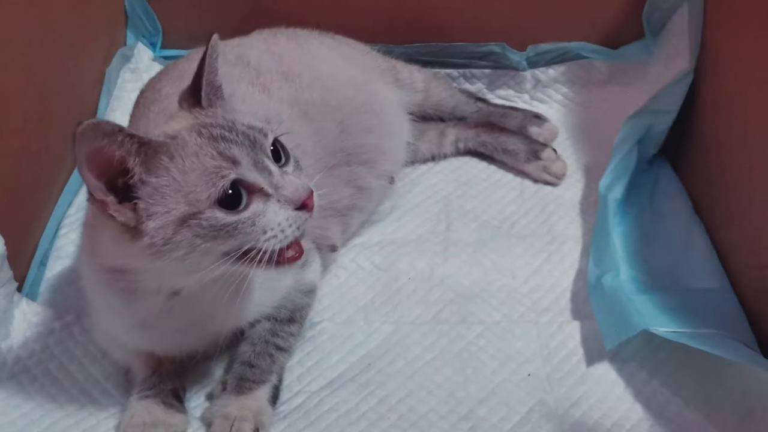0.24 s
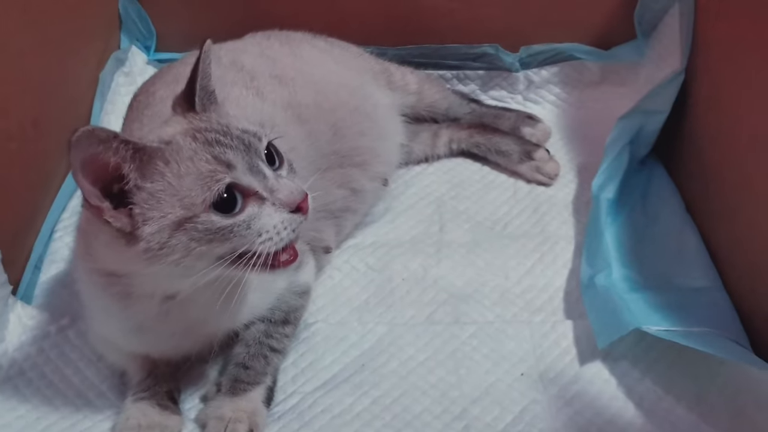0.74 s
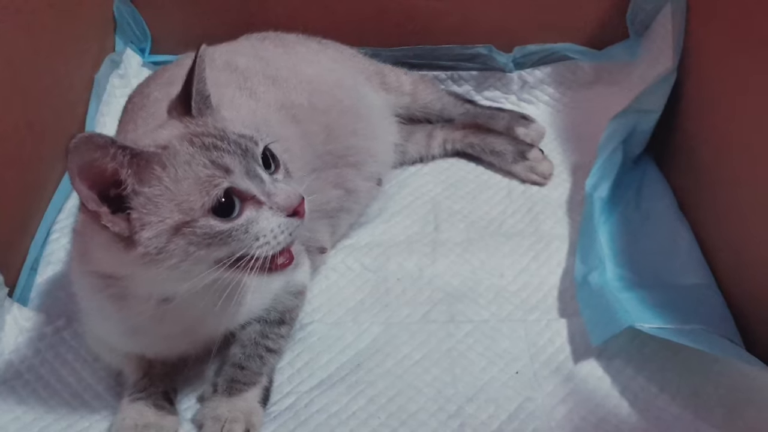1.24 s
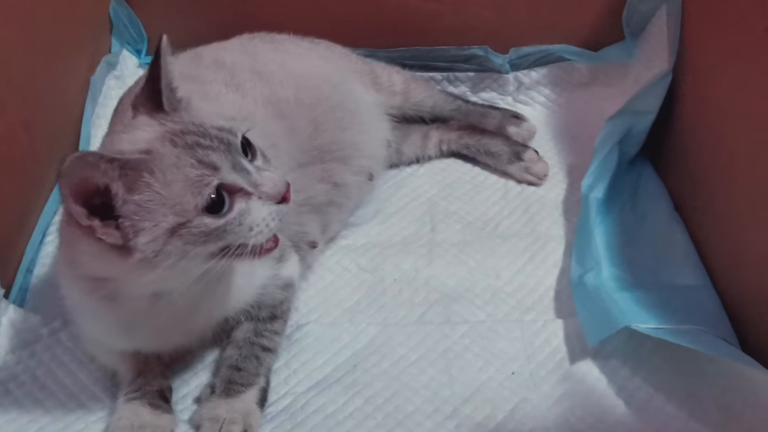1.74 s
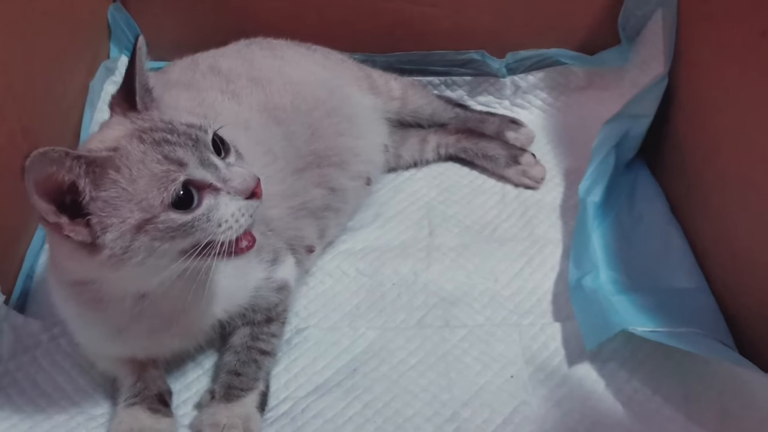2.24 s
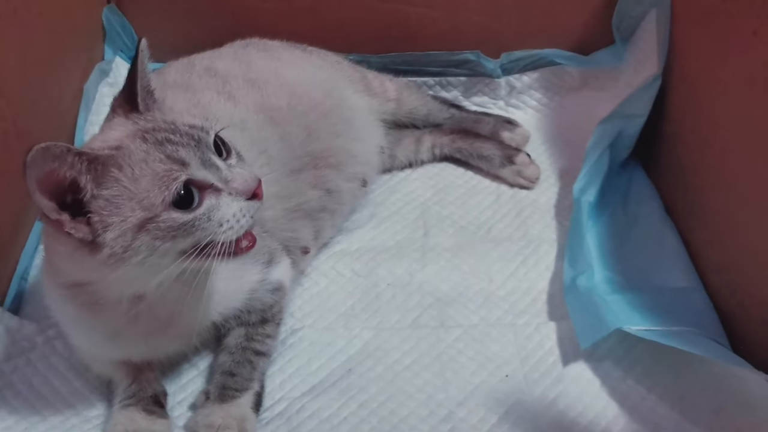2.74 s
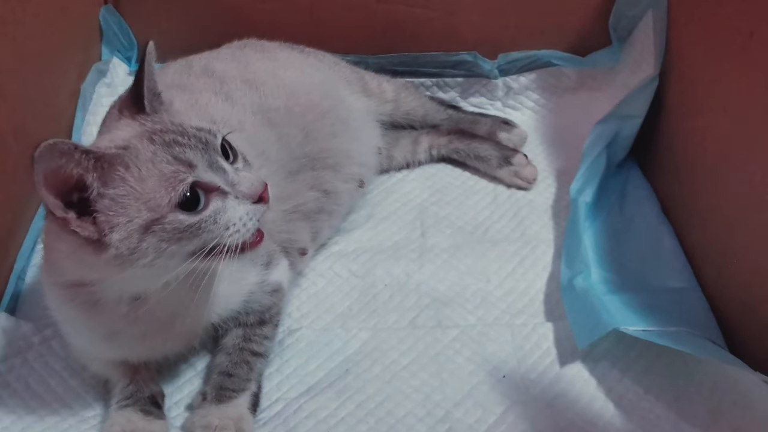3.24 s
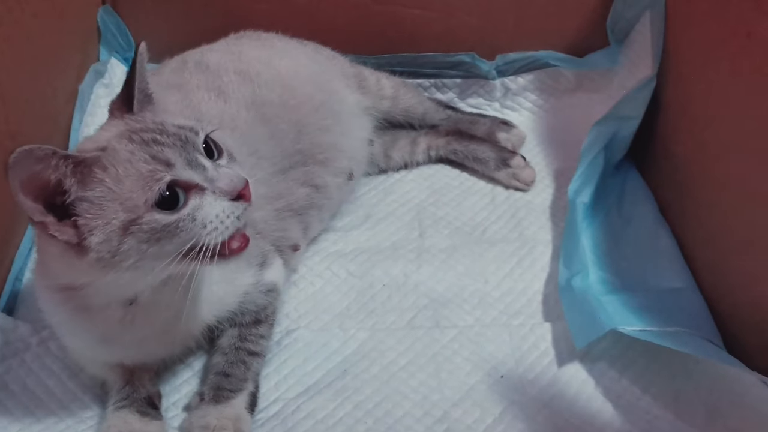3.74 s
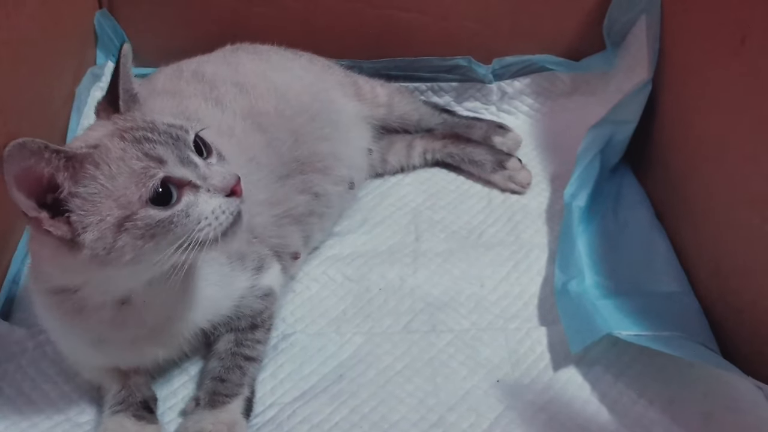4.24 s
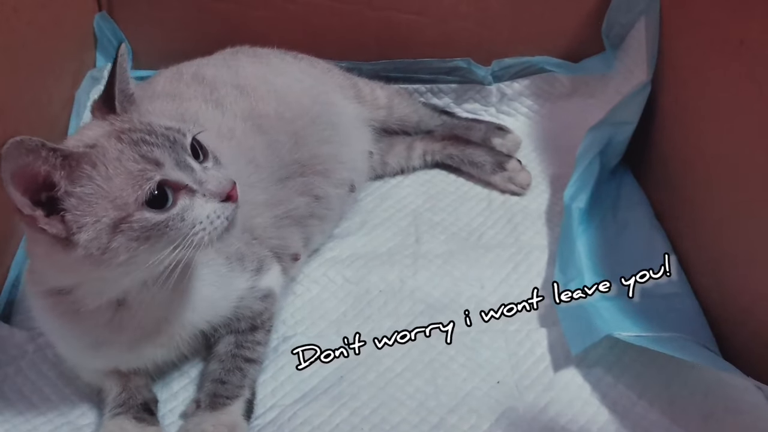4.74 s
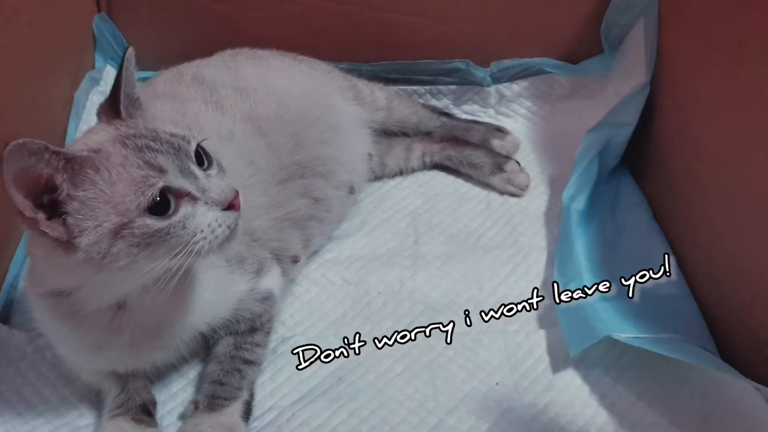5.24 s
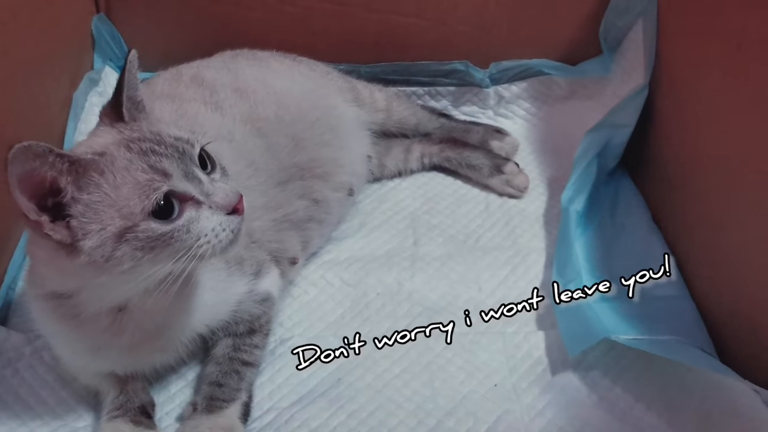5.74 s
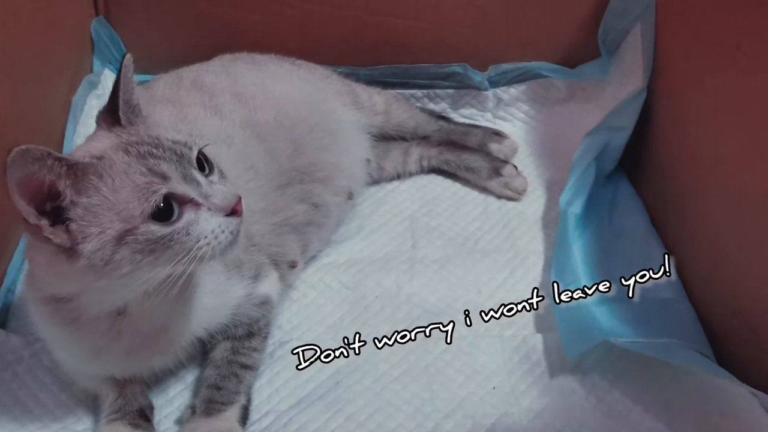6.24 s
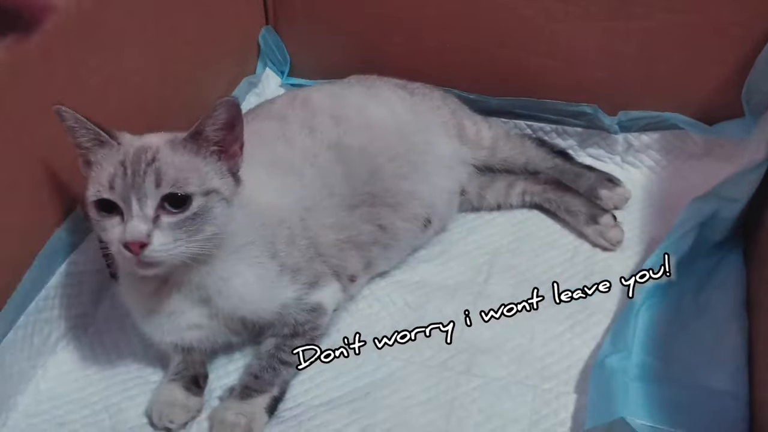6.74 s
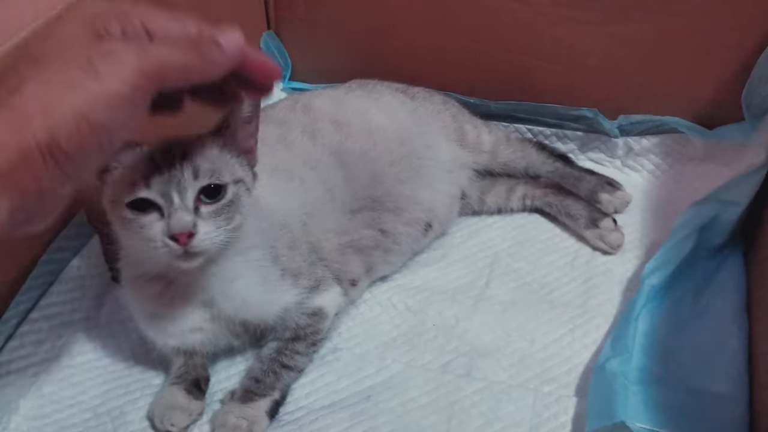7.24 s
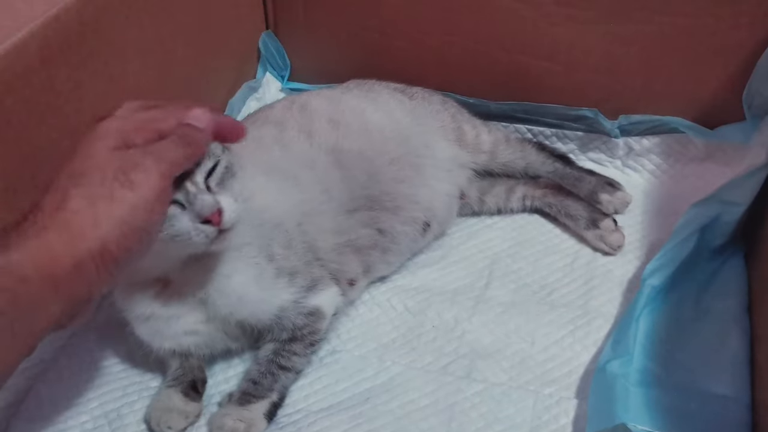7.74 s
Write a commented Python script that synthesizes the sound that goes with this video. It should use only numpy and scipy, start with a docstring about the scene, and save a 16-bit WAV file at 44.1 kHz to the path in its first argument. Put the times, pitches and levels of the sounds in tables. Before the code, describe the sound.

From the start a compressor motor drones in a room, a low hum that throbs five or six times a second over the even rush of its fan and a faint, fine rattle. At about 3.5 seconds a cat in a padded box mews once, just right of centre. The call opens with a thin, high squeak, holds a nearly level pitch, rises above the drone and fades by 3.9 seconds, with very little echo. The machine carries on, swelling slightly for an instant at about 5 seconds and again near 6.4. At about 6.7 seconds the sound changes abruptly to another microphone position, where the drone and rush are weaker. From there a hand shifting on the microphone adds a soft, lumpy bass rumble, with several small bumps over the continuing hum until the end at 8 seconds.

```python
"""A compressor motor drones in the room over the rush of its fan; its shaft turns a little slower
than the mains field, so the drone throbs. Midway a cat mews once from inside a padded box, the
harmonics of its vocal folds shaped by throat and mouth. The two-port microphone takes the room from
two positions, joined by a cut: at the second the drone is weaker and the hand on the case rumbles."""
import sys
import numpy as np
from scipy import signal
from scipy.io import wavfile
from scipy.ndimage import uniform_filter1d

SR = 44100
rng = np.random.default_rng(int(sys.argv[2]) if len(sys.argv) > 2 else 0)


def int16_out(signal):
    """Quantize to a 16-bit WAV file."""
    q = np.round(np.clip(np.atleast_2d(signal).T, -1, 1) * 32767)
    wavfile.write(sys.argv[1], SR, q.astype(np.int16))


N = 352342

# the cat's voice: t/s, pitch f/Hz, effort level/dB, mouth opening/0-1
MEW_CURVE = [(3.525, 598, -48, .6), (3.55, 593, -37.5, 0.87), (3.6, 593, -33, 0.98), (3.635, 602, -28, 1),
             (3.654, 613, -33.5, .95), (3.668, 592.6, -28, .9), (3.705, 581.7, -30, .75),
             (3.76, 591, -34, .25), (3.815, 606, -37, 0), (3.83, 605, -47, 0.92), (3.87, 600, -54, 0.68)]
# throat resonances: f/Hz, width/Hz, level/dB, exponent with which each follows the mouth
FORMANTS = [(600, 350, -15, -3), (1170, 420, -0.5, -2.5), (2286, 440, 2, 0.9), (3060, 330, -10, 0.1),
            (3850, 500, -21, 4), (5500, 570, -39, 0.8), (6580, 420, -24, 1.2), (7830, 720, -26.5, 1),
            (9200, 770, -42, .6)]
# the squeak that opens the mew: t/s, f/Hz, level/dB
SQUEAK_CURVE = [(3.49, 1950, -56), (3.515, 2135, -50), (3.525, 2320, -37), (3.535, 2145, -38),
                (3.545, 2370, -46)]
# breath at both ends of the mew: t/s, half-width/s, level/dB
BREATH_PUFFS = [(3.53, .012, -69), (3.835, .016, -64)]
# echoes off the box walls: delay/ms, factor at the left port, factor at the right port
BOX_ECHOES = [(.6, .45, -.45), (1.05, -.4, .4), (2.3, .15, .12)]
# motor speed, one table a microphone position: t/s, shaft f/Hz, throb f/Hz
MOTOR_SPEED = [
    [(0, 57.197, 5.573), (2.5, 57.168, 5.567), (5, 57.14, 5.578), (6.74, 57.119, 5.595)],
    [(6.74, 57.157, 5.65), (8, 57.157, 5.65)],
]
# drone: shaft order, throb sideband, then for each position level/dB, left-right/dB, left lead/rad
DRONE_LINES = [(2, 0, -41.2, -2.4, 0.1, -46.1, -3.9, -0.0), (2, 1, -40.4, -2.2, 0.1, -46.6, -3.7, 0.1),
               (2, 2, -62.8, -2.1, 0.1, -75.0, -2.7, 2.0), (3, -1, -56.9, -2.0, 0.0, -58.5, -2.5, -0.0),
               (3, 0, -32.0, -2.4, 0.1, -38.8, -2.4, 0.2), (3, 1, -46.9, -2.3, 0.1, -52.4, -2.0, 0.3),
               (4, 0, -52.4, -3.2, 0.0, -55.9, -1.2, 0.3), (4, 2, -46.8, -0.9, 0.0, -56.8, 2.6, -0.0),
               (5, 0, -56.9, 0.0, -0.9, -62.8, -3.7, 0.9), (5, 1, -55.6, 1.5, -0.0, -58.4, -5.0, -0.9),
               (5, 2, -56.3, -3.8, -0.7, -55.8, -2.4, -0.3), (6, 0, -52.1, 0.1, 1.0, -59.2, -2.8, 2.2),
               (6, 1, -58.7, 13.1, 0.9, -64.5, -3.4, -2.7), (6, 3, -55.1, 0.2, 2.8, -56.1, -21.2, -1.3),
               (8, 0, -61.8, 15.8, -2.0, -66.8, -10.4, -0.6), (10, 0, -56.4, -5.7, -0.1, -65.2, 3.7, -1.6),
               (11, 0, -59.0, 0.5, 0.1, -68.7, 3.4, -1.9), (12, 0, -61.9, 2.3, -1.1, -66.7, -0.5, 1.2),
               (13, 0, -51.8, -2.8, 1.5, -54.4, -4.2, 1.0), (13, 1, -59.2, -6.2, 1.2, -66.6, -1.2, 0.6),
               (14, 0, -59.4, -3.8, -2.5, -72.2, -7.1, -0.5), (15, 0, -55.9, 5.6, -1.4, -56.9, -20.1, 1.3),
               (16, 0, -54.0, -3.7, 2.1, -62.9, -4.0, 0.7), (17, 0, -60.2, 2.9, 0.5, -61.5, -13.8, -2.4),
               (18, 0, -60.1, -8.0, 2.1, -67.3, 8.0, 0.5), (20, 0, -60.8, -0.6, 0.6, -70.5, -0.6, 2.5),
               (21, -1, -63.4, -1.4, 2.8, -73.2, -2.7, -0.8), (21, 0, -62.6, -0.3, -1.9, -74.1, -3.8, -1.0),
               (22, 0, -61.7, 8.2, -2.8, -73.2, -9.8, 2.6)]
# moments when drone and rush grow louder: t/s, half-width/s, added level/dB in a wide and a narrow band
BRIEF_SWELLS = [(4.965, 0.055, -5, 1), (6.356, 0.039, -12, -6)]
# valve rattle: f/Hz, typical level/dB of one shaft order at each position
RATTLE_SPECTRUM = [(1300, -64, -75), (1470, -67, -76), (2040, -71.5, -75), (3700, -79, -81.5),
                   (4130, -68, -66.5), (4860, -76, -87)]
# fan: f/Hz, base level/dB per Hz at each position, left-right/dB at each position, port likeness/0-1
FAN_SPECTRUM = [(25, -84.5, -71, 2, -2, .5), (60, -76.5, -81, -3, -2, 1), (121, -64.5, -68.5, -3.5, -3, 1),
                (198, -72, -81, -6.5, -2.5, 0.93), (280, -72, -77.5, 6.5, -5, 0.54),
                (454, -76, -76.5, -6.5, -3.5, 0.5), (780, -73, -82, -2, -2, 0.5),
                (1240, -76.5, -81.5, -2, -1, 0.35), (1680, -79.5, -85.5, 0, -6, 0.69),
                (2065, -84, -90, 1.5, -6, 0.51), (3130, -89, -91, -6.5, -7, 0.25),
                (4140, -86, -89, -6, -15, 0.82), (5800, -99, -100, -4, -4, 0.21),
                (6780, -97, -100.5, -5, -12, 0.85), (8440, -106, -108, 4.5, 6, 0.82),
                (12200, -110, -113, 1, -1, 1), (13100, -114, -117, -2, 0, .99),
                (16000, -123, -126, 2, 0, .99)]
# how far the rush leads at the left port, one table a position: f/Hz, lead/rad
FAN_LEAD = [
    [(0, 0), (600, .1), (1210, 4.1), (1640, 3.4), (2070, .5), (2930, -.2), (3700, -3.6), (4130, -1.9),
     (4390, -7.2), (4740, -11.4), (5250, -11.7), (6460, -6.3)],
    [(0, 0), (600, 0), (1290, 3), (1550, 2.8), (2500, 5.9), (3100, 7), (3960, 9.8), (4220, 15.4),
     (4480, 16.2), (4820, 19.1), (5080, 18.4), (6980, 25.1)],
]
# narrow peaks and dips in the noise, the lowest the shaft's faint hum: f/Hz, half-width/Hz, level/dB
RUSH_COLOUR = [(2002, 67, 4), (2800, 56, 2), (444, 27, -3.5), (56, 8, 3.5), (145, 10, -3), (410, 20, -3)]
# the hand shifts on the microphone case: t/s, level/dB
HAND_BUMPS = [(6.77, -42), (7.04, -46), (7.26, -49), (7.49, -52), (7.645, -50), (7.835, -47), (7.97, -49)]

THROAT_SHUT, THROAT_OPEN = .97, 1.036  # formant shift, before each formant's exponent
TILT_SHUT_DB, TILT_OPEN_DB = -4.5, 4  # per octave
CLEAR_DB, ROUGH_PER_DB, ROUGH_MOST = -32, .025, .16  # below this effort the voice turns hoarse
GRAIN, BREAKUP_DB = .03, 2.5  # constant roughness; each overtone swells and sinks on its own
THROB_START = -.38, .05  # throb cycles passed as each position begins
BEAT_HZ, BEAT_DB = .638, -8  # a weaker tone just under the mains hum beats against it
BEAT_TOP_S = 1.315, 7.2  # a moment at each position when the two tones add
GRIP_DB, BUMP_S = -62, .035
CUT_S, FADE_OUT_S, FADE_IN_S = 6.7408, .0006, .008


def mew(t):
    """Harmonics of the folds, weighted by throat resonances; an open mouth lifts and brightens them."""
    hz, effort_db, opening = along(MEW_CURVE, t)
    mouth = THROAT_SHUT + (THROAT_OPEN - THROAT_SHUT) * opening
    tilt_db = TILT_SHUT_DB + (TILT_OPEN_DB - TILT_SHUT_DB) * opening
    rough = np.clip(ROUGH_PER_DB * (CLEAR_DB - effort_db), 0, ROUGH_MOST)
    phase = phase_of(hz * (1 + .0056 * wander(len(t), 150)))
    voice, power = 0, 0
    for k in range(1, 21):
        weight = sum(gain_of(db) / (1 + (2 * (k * hz - f * mouth ** follow) / width) ** 2)
                     for f, width, db, follow in FORMANTS)
        weight *= gain_of(tilt_db * np.log2(k / 3))
        hoarse = (rough + GRAIN) * np.sqrt(k) + .003 * k ** 2  # upper harmonics blur most
        flutter = 1 + hoarse * wander(len(t), 45, 45)
        breakup = gain_of(BREAKUP_DB * min(k / 6, 1) * wander(len(t), 900, 900))
        voice += weight * flutter * breakup * np.cos(k * phase + 2 * np.pi * rng.random())
        power += weight ** 2 / 2
    return gain_of(effort_db) * fade_ends(MEW_CURVE, t, fade_s=.021) * voice / np.sqrt(power)


def squeak(t):
    """A thin unsteady whistle with its octave."""
    hz, db = along(SQUEAK_CURVE, t)
    phase = phase_of(hz * (1 + .039 * wander(len(t), 80)))
    whistle = np.cos(phase) + .19 * np.cos(2 * phase)
    return gain_of(db) * fade_ends(SQUEAK_CURVE, t, fade_s=.006) * whistle


def cat_in_box():
    """The call, just right of centre: direct, off the box walls and faintly off the room."""
    t = np.arange(3.4, 4.2, 1 / SR)
    breath = sum(gain_of(db) * bell(t, s, width) for s, width, db in BREATH_PUFFS)
    call = mew(t) + squeak(t) + breath * noise_band(len(t), 8000, 11500)
    dulled = signal.sosfilt(butter(5000, "low"), call)  # padding soaks up the treble
    echoes = sum(np.outer(ports, np.interp(t - ms / 1000, t, dulled)) for ms, *ports in BOX_ECHOES)
    room = rng.standard_normal((2, 6000)) * gain_of(-60 * np.arange(6000) / SR / .25)  # 60 dB in .25 s
    room /= np.linalg.norm(room, axis=1, keepdims=True)
    reverb = signal.fftconvolve(dulled[None], room, axes=1)[:, :len(t)]
    direct = gain_of([[-.6], [.6]]) * call
    out, start = np.zeros((2, N)), round(t[0] * SR)
    out[:, start:start + len(t)] = direct + echoes + gain_of(-14) * reverb
    return out


def compressor(t, position):
    """Drone, rattle and rush from one microphone position; the level swells briefly at set moments."""
    shaft_hz, throb_hz = along(MOTOR_SPEED[position], t)
    shaft = phase_of(shaft_hz)
    throb = phase_of(throb_hz) + 2 * np.pi * THROB_START[position]
    steady = motor_drone(t, shaft, throb, position) + valve_rattle(shaft, position)
    steady += fan_rush(shaft, position)
    wide = signal.sosfiltfilt(butter([140, 1400], "band"), steady)
    narrow = signal.sosfiltfilt(butter([265, 380], "band"), steady)
    return steady + sum(bell(t, s, width) * (gain_of(wide_db) * wide + gain_of(narrow_db) * narrow)
                        for s, width, wide_db, narrow_db in BRIEF_SWELLS)


def motor_drone(t, shaft, throb, position):
    """Shaft orders; each sideband keeps step with its order, so all throb together."""
    out, start_phase = np.zeros((2, len(t))), 2 * np.pi * rng.random(100)
    beat = 1 + gain_of(BEAT_DB) * np.exp(-2j * np.pi * BEAT_HZ * (t - BEAT_TOP_S[position]))
    for order, sideband, *heard in DRONE_LINES:
        order, sideband = round(order), round(sideband)
        db, pan_db, lead = heard[3 * position:][:3]
        phase = order * shaft + sideband * throb + start_phase[order]
        tone = np.sqrt(2) * gain_of(db) * np.exp(1j * np.array([phase + lead / 2, phase - lead / 2]))
        if (order, sideband) == (2, 1):  # the mains hum
            tone *= beat
        left_share = 1 / (1 + gain_of(-2 * pan_db))
        out += np.sqrt([[2 * left_share], [2 - 2 * left_share]]) * tone.real
    return out


def valve_rattle(shaft, position):
    """High shaft orders; each has its own strength and reaches the two ports by its own path."""
    shaft_hz = MOTOR_SPEED[position][0][1]
    shaken = shaft + .0082 * wander(len(shaft), 4000)
    out = 0
    for order in range(23, 88):
        db = read(RATTLE_SPECTRUM, order * shaft_hz, 1 + position) + 2.5 * rng.standard_normal((2, 1))
        out += np.sqrt(2) * gain_of(db) * np.cos(order * shaken + 2 * np.pi * rng.random((2, 1)))
    return out


def fan_rush(shaft, position):
    """Air noise, partly shared by the two ports; the treble pulses with the valve strokes."""
    frames, hz = len(shaft) // 512 + 5, np.fft.rfftfreq(2048, 1 / SR)
    noise = rng.standard_normal((frames, len(hz), 5)).T
    left, unshared = noise[0] + 1j * noise[1], noise[2] + 1j * noise[3]
    flicker_db = 1.15 * unit_power(uniform_filter1d(uniform_filter1d(noise[4], 12, axis=0), 6, axis=1))
    likeness = np.clip(read(FAN_SPECTRUM, hz, column=5), 0, 1)[:, None]
    lag = np.exp(-1j * read(FAN_LEAD[position], hz, column=1))[:, None]
    right = likeness * left * lag + np.sqrt(1 - likeness ** 2) * unshared
    pan = gain_of(read(FAN_SPECTRUM, hz, column=3 + position) / 2)[:, None]
    colour_db = read(FAN_SPECTRUM, hz, column=1 + position)
    colour_db += sum(db * bell(hz, f, width) for f, width, db in RUSH_COLOUR)
    spectra = np.array([left * pan, right / pan]) * gain_of(colour_db[:, None] + flicker_db)
    _, air = signal.istft(spectra, SR, nperseg=2048, noverlap=1536, scaling="psd")
    air = air[:, 1024:1024 + len(shaft)]
    strokes = .04 * np.cos(shaft) + .067 * np.cos(2 * shaft) + .08 * np.cos(4 * shaft)
    return air + strokes * signal.sosfilt(butter(600, "high"), air)


def handling_rumble(t):
    """Lumpy bass from the hand right on the microphone case, unrelated at the two ports."""
    level = gain_of(GRIP_DB) + sum(gain_of(db) * bell(t, s, BUMP_S) for s, db in HAND_BUMPS)
    return level * noise_band((2, len(t)), 25, 80)


def gain_of(db):
    """Decibels to a factor."""
    return 10 ** (np.asarray(db) / 20)


def phase_of(hz):
    """Running phase in radians."""
    return 2 * np.pi * np.cumsum(hz) / SR


def unit_power(x):
    """Scales to a mean square of one."""
    return x / np.sqrt(np.mean(x ** 2) + 1e-20)


def read(table, hz, column):
    """One column of a spectrum table on a log-frequency axis."""
    columns = np.transpose(table)
    return np.interp(np.log(hz + 1), np.log(columns[0] + 1), columns[column])


def along(curve, t):
    """The columns of a curve at the times t."""
    times, *columns = np.transpose(curve)
    return [np.interp(t, times, column) for column in columns]


def fade_ends(curve, t, fade_s):
    """Ramps up from a curve's first time and down to its last."""
    return np.clip(np.minimum(t - curve[0][0], curve[-1][0] - t) / fade_s, 0, 1)


def bell(x, centre, half_width):
    """A Gaussian in time or frequency."""
    return np.exp(-.5 * ((x - centre) / half_width) ** 2)


def butter(hz, kind):
    """A gentle filter, as second-order sections."""
    return signal.butter(2, hz, kind, fs=SR, output="sos")


def noise_band(shape, low_hz, high_hz):
    """Band-passed noise at unit power."""
    return unit_power(signal.sosfilt(butter([low_hz, high_hz], "band"), rng.standard_normal(shape)))


def wander(n, *spans):
    """Unit-power noise, smoothed over each span of samples in turn."""
    x = rng.standard_normal(n)
    for span in spans:
        x = uniform_filter1d(x, span)
    return unit_power(x)


def scene():
    """The compressor from two positions, joined by a hard cut; the cat calls during the first."""
    early, late = np.split(np.arange(N) / SR, [round(CUT_S * SR)])
    second = compressor(late, position=1) + handling_rumble(late)
    second *= np.clip((late - CUT_S) / FADE_IN_S, 0, 1)
    first = compressor(early, position=0) * np.clip((CUT_S - early) / FADE_OUT_S, 0, 1)
    return np.hstack([first, second]) + cat_in_box()


def record(dry):
    """The microphone chain: a steep treble limit and a small DC offset."""
    lowpass = signal.firwin(1023, cutoff=15725, window=("kaiser", 9), fs=SR)
    return signal.oaconvolve(dry, lowpass[None], "same") - .0007


dry = scene()
out = record(dry)
int16_out(out)
```